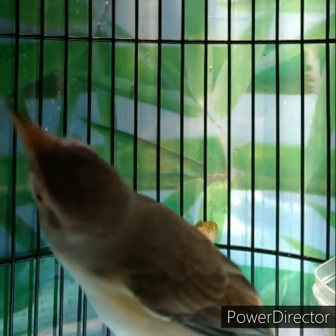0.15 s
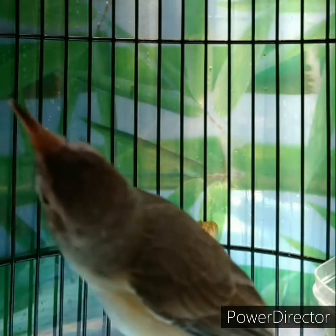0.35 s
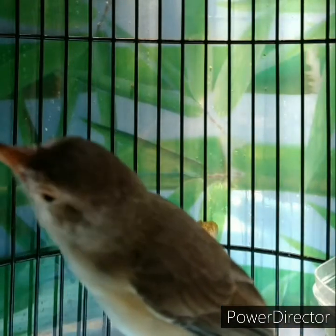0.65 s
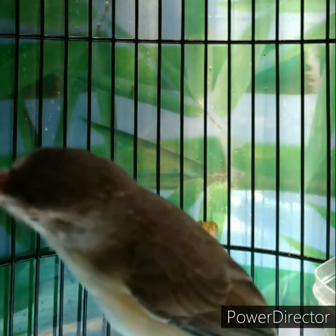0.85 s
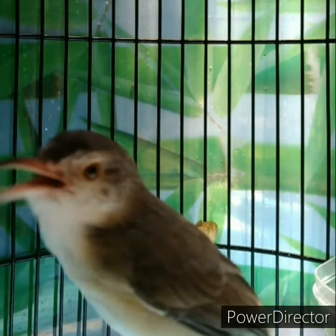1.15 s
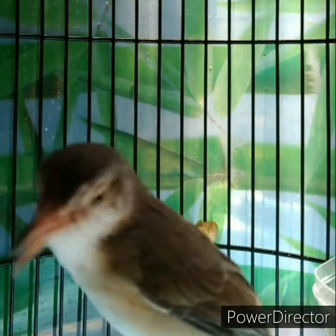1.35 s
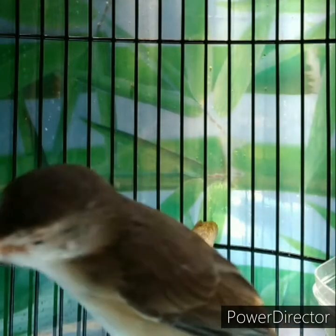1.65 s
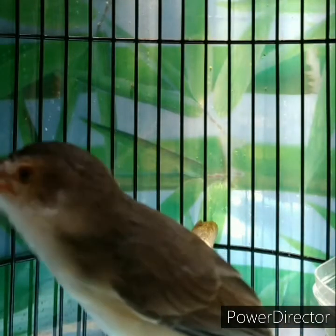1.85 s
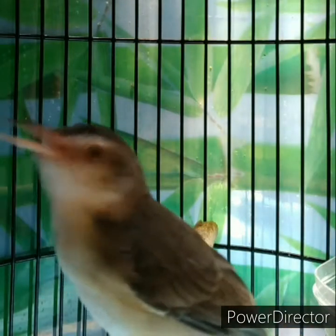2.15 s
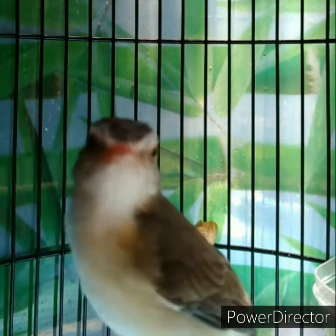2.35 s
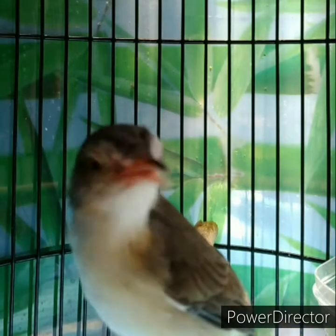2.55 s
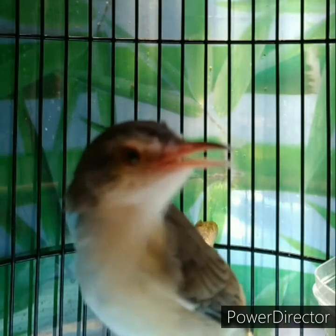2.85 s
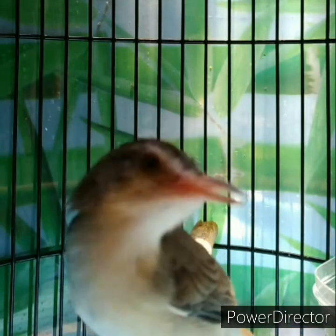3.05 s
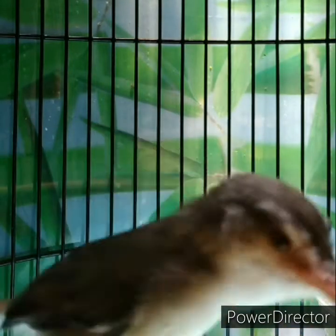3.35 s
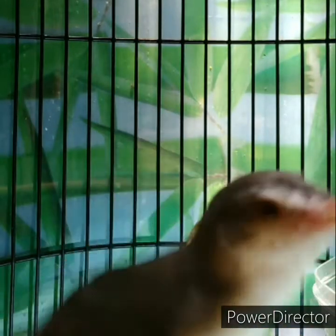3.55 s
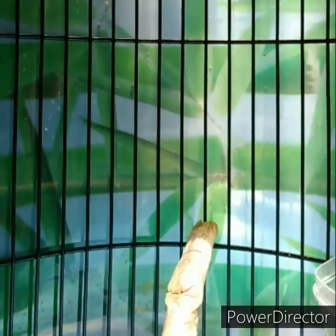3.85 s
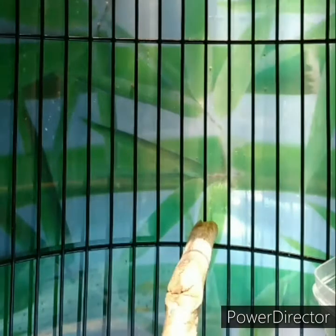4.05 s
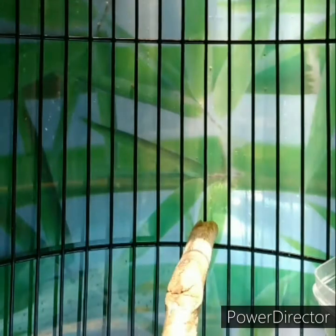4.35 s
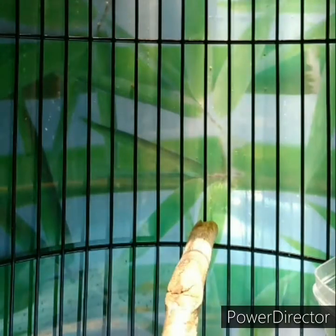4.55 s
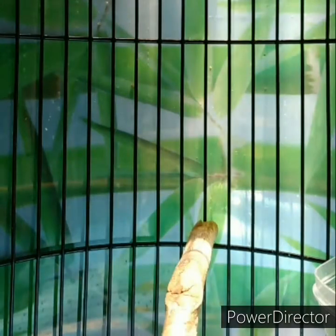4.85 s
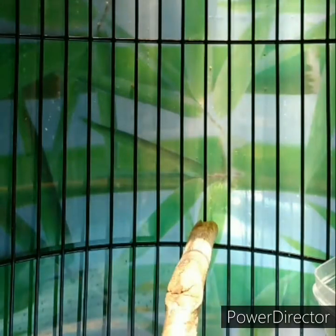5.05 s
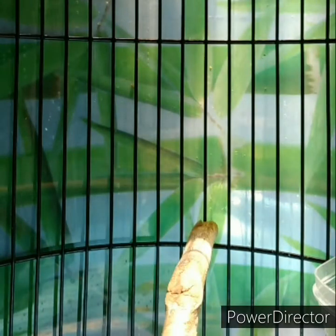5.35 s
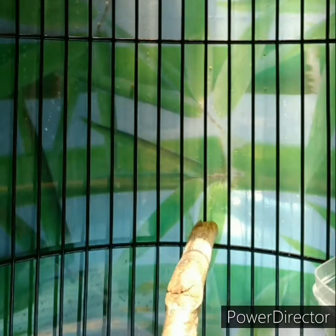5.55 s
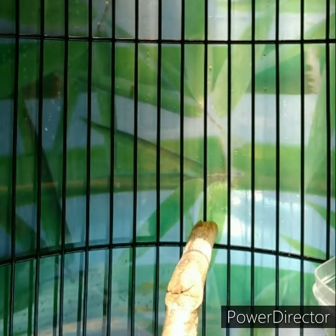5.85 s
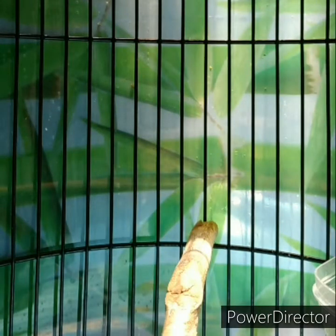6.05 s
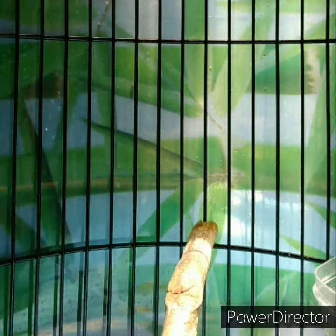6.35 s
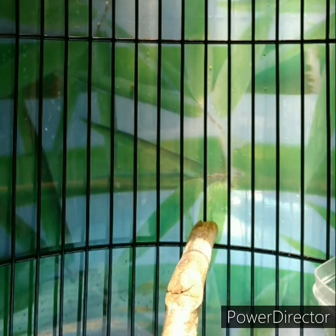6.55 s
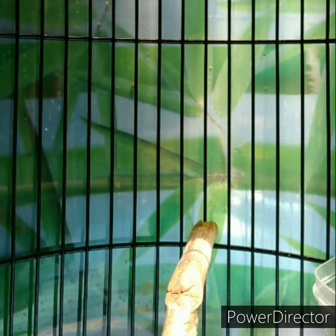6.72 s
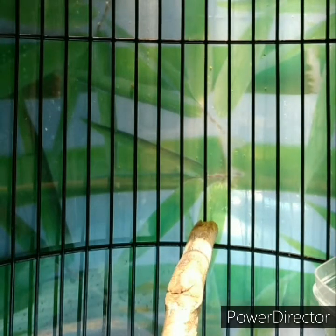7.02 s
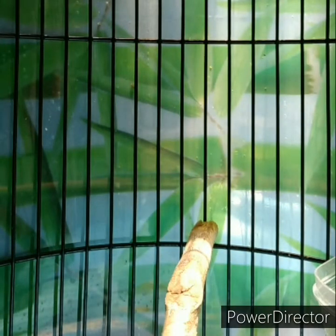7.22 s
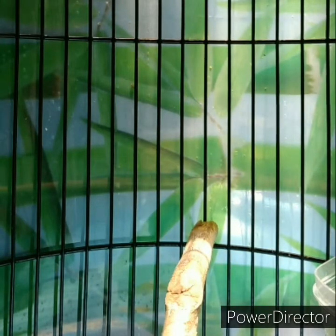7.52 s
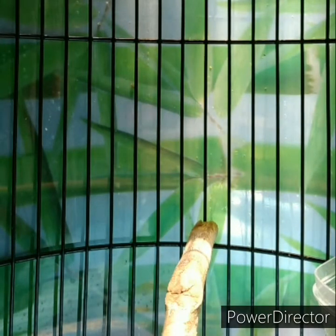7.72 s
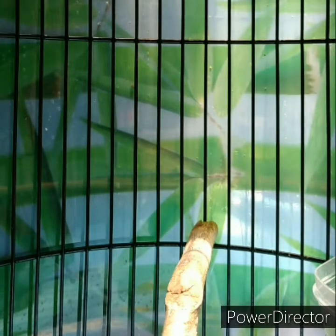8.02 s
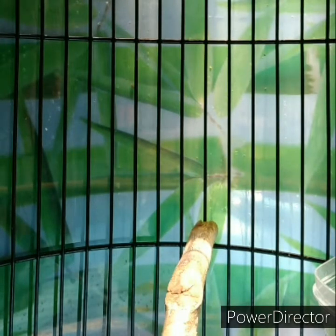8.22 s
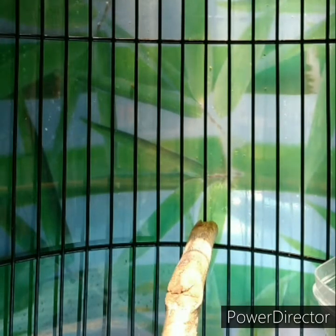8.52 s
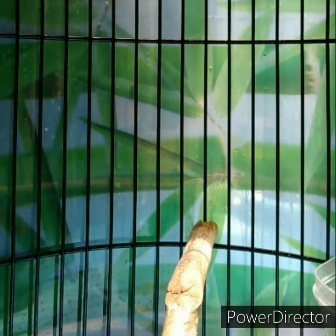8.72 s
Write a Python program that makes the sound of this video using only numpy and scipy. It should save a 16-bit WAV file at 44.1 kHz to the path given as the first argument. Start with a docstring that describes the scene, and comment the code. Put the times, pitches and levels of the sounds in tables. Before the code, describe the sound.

Rapid, ringing chirps from a nearby songbird, with thin high whistles from a second bird and soft room hum behind.

```python
"""A caged prinia, a small songbird, sings close by, about four syllables a second. Each is a tick,
a steep chip, then a ringing note, made by vibrating membranes in its voice box, the syrinx.
A second small bird cuts in with high falling whistles; others warble and pipe further off.
There are soft rustles at the cage and one lone tick. The cage and a small room add echoes, over
soft hiss, electrical hum and the murmur of traffic, in which one engine winds down."""
import sys
import numpy as np
from scipy import signal
from scipy.fft import rfft, irfft
from scipy.io import wavfile
from scipy.ndimage import uniform_filter1d, minimum_filter1d, map_coordinates

SR = 44100
rng = np.random.default_rng(int(sys.argv[2]) if len(sys.argv) > 2 else 0)


def transcribe(signal):
    """Save signal, clipped to [-1, 1], as a 16-bit WAV file at the path in sys.argv[1]."""
    frames = np.atleast_2d(signal).T
    limited = np.clip(frames, -1, 1)
    pcm = np.round(limited * 32767).astype(np.int16)
    wavfile.write(sys.argv[1], SR, pcm)


N = 391608
TIME = np.arange(N) / SR

# The prinia's song. Each row: time of the chip in seconds, seconds from there to the note's peak,
# base pitch in Hz, relative level in dB.
SYLLABLES = [(-0.012, 0.067, 2333.0, -10.8), (0.208, 0.059, 2371.0, -11.4), (0.422, 0.064, 2308.0, -12.2),
             (0.633, 0.069, 2322.0, -10.4), (0.856, 0.064, 2338.0, -11.4), (1.076, 0.066, 2368.0, -11.0),
             (1.303, 0.057, 2406.0, -9.9), (1.525, 0.066, 2345.0, -8.6), (1.745, 0.078, 2272.0, -9.8),
             (1.976, 0.063, 2341.0, -10.2), (2.196, 0.062, 2337.0, -10.1), (2.414, 0.06, 2348.0, -9.5),
             (2.645, 0.069, 2358.0, -10.4), (2.865, 0.071, 2316.0, -12.3), (3.093, 0.065, 2342.0, -10.1),
             (3.334, 0.067, 2371.0, -9.4), (3.553, 0.064, 2379.0, -8.4), (3.782, 0.063, 2333.0, -13.9),
             (4.036, 0.065, 2311.0, -15.8), (4.301, 0.075, 2268.0, -15.2), (4.535, 0.073, 2348.0, -13.8),
             (4.756, 0.067, 2387.0, -9.8), (4.988, 0.067, 2369.0, -10.5), (5.217, 0.071, 2361.0, -8.5),
             (5.453, 0.065, 2349.0, -11.4), (5.695, 0.057, 2333.0, -13.0), (7.113, 0.068, 2284.0, -14.6),
             (7.365, 0.063, 2306.0, -14.8), (7.59, 0.056, 2333.0, -15.4), (7.818, 0.063, 2380.0, -13.5),
             (8.032, 0.064, 2335.0, -13.9), (8.268, 0.058, 2379.0, -16.5), (8.498, 0.065, 2371.0, -13.5),
             (8.732, 0.07, 2342.0, -13.8)]
# A note's harmonics; the throat boosts the second. Each row: multiple of the base pitch, level in dB.
NOTE_HARMONICS = [(1, -43), (2, 0), (3, -36), (4, -30), (5, -38), (6, -41)]
# The prinia turns its head and moves about. Each row: time in seconds, left minus right level in dB.
FACING = [(0, 6.5), (.3, 1.5), (1.35, 3), (1.6, 11), (2.1, -1.5), (2.6, 14), (2.95, -2), (3.4, 10.5),
          (4.1, 0.5), (5, -12), (5.75, -3), (7.2, 8.5), (7.65, 3.5), (8.8, 0.5)]


def prinia_notes(attack_s=.044, release_s=.016, opening_s=.013, held_back_db=7, arch_hz=60):
    """Each note arches in pitch, starts held back, opens up just before its peak and is shut off fast."""
    out = np.zeros((2, N))
    t = np.arange(-.065, .03, 1 / SR)  # seconds from the peak
    for chip_time, delay, hz, db in SYLLABLES:
        peak_time = chip_time + delay
        stretch = np.exp(.14 * rng.standard_normal(3))
        attack, release, opening = np.array([attack_s, release_s, opening_s]) * stretch
        swell_db = 4 - 20 * np.where(t < 0, np.abs(t / attack) ** 1.5, np.abs(t / release) ** 3)
        held_db = held_back_db * rng.uniform(.4, 1) * (1 - np.tanh((t + opening) / .0018)) / 2
        below_top_hz = arch_hz * rng.uniform(0, 2) * (t / np.where(t < 0, .045, .03)) ** 2
        waver = .006 * wander(100, len(t)) + .007 * wander(900, len(t))
        flutter_db = 1.3 * wander(240, len(t))
        scatter_db = 4 * rng.standard_normal(len(NOTE_HARMONICS))  # varies all but the second harmonic
        harmonics = [(k, level + (k != 2) * shift)
                     for (k, level), shift in zip(NOTE_HARMONICS, scatter_db)]
        voice = tone((hz - below_top_hz) * (1 + waver), harmonics)
        voice *= undb(db + swell_db - held_db + flutter_db)
        pan_db = np.interp(peak_time, *np.transpose(FACING))
        lag_ms = perch_lag(peak_time) + .007 * rng.standard_normal()  # the head is never quite still
        add(out, peak_time + t[0], voice, pan_db, lag_ms)
    return room(out, early_db=-17, tail_db=-21.5, tail_s=.21, early_s=.008)


# The tick's sweep. Each row: seconds from the chip's peak, pitch in Hz, relative level in dB.
TICK_SWEEP = [(-.0145, 7800, -14), (-.0128, 5800, -6), (-.0115, 3800, 1), (-.0098, 2200, -11)]
# The chip's sweep. Each row: seconds from its peak, pitch in Hz, relative level in dB.
CHIP_SWEEP = [(-.008, 5400, -20), (-.004, 4500, -6), (-.001, 3650, 1), (.002, 3100, 0), (.004, 2750, -4),
              (.007, 2300, -11), (.01, 2000, -25)]


def prinia_chips(roughness=.047, flutter_db=3):
    """Two steep, scratchy downward sweeps, a tick and a chip, open each syllable, never twice alike."""
    out = np.zeros((2, N))
    for chip_time, _, _, syllable_db in SYLLABLES:
        chip_db = -17.5 + .73 * syllable_db  # louder syllables get louder chips
        for sweep in (TICK_SWEEP, CHIP_SWEEP):
            times, hz, swell_db = np.transpose(sweep)
            times = times * np.exp(.1 * rng.standard_normal())
            t = np.arange(times[0], times[-1], 1 / SR)
            detune = roughness * wander(917, len(t)) + .025 * rng.standard_normal()
            pitch = np.interp(t, times, hz) * (1 + detune)
            level_db = chip_db + np.interp(t, times, swell_db) + flutter_db * wander(685, len(t))
            voice = tone(pitch, [(1, 0), (2, -23), (3, -21)]) * signal.windows.tukey(len(t), .3)
            scratch = undb(-14) * band_noise(7000, 1.1, len(t))
            chip = (voice + scratch) * undb(level_db)
            add(out, chip_time + t[0], chip, pan_db=-1, lag_ms=perch_lag(chip_time))
    return room(out, early_db=-4, tail_db=-9, tail_s=.17)


def prinia_rasp(chip_s=.018, note_s=.05):
    """A faint, uneven hiss swells around each tick and chip, and again under the note."""
    out = np.zeros((2, N))
    t = np.arange(-.05, .14, 1 / SR)
    bands = [(1800, -60), (4800, -49), (10000, -53)]
    for chip_time, delay, _, _ in SYLLABLES:
        around_chip = undb(-1) * np.exp(-(t / chip_s) ** 2)
        under_note = undb(-3) * np.exp(-((t - delay) / note_s) ** 2)
        for pan_db in (-20, 20):  # each side gets its own hiss
            hiss = sum(undb(db) * band_noise(hz, .6, len(t)) for hz, db in bands)
            flutter = undb(2 * wander(140, len(t)))
            add(out, chip_time + t[0], hiss * (around_chip + under_note) * flutter, pan_db)
    return out


# The prinia hops to another perch and shifts along it.
# Each row: time in seconds, delay of the left side in milliseconds.
PERCH = [(3.6, .14), (4.0, .315), (4.4, .315), (4.7, .35), (5.8, .355), (7.2, .275), (8.1, .305)]


def perch_lag(time):
    """How many milliseconds later the song reaches the microphone's left side than its right."""
    return np.interp(time, *np.transpose(PERCH))


# The second bird's whistles.
# Each row: start in seconds, length in seconds, rough starting pitch in Hz, relative level in dB.
WHISTLES = [(0.149, 0.059, 7300, -19.5), (0.483, 0.053, 7060, -22.5), (0.63, 0.073, 7405, -16.5),
            (1.265, 0.035, 6820, -21.5), (1.523, 0.048, 7130, -18), (1.788, 0.056, 7100, -19),
            (2.223, 0.26, 7290, -17), (4.574, 0.029, 6740, -19.5), (4.76, 0.063, 7230, -14.5),
            (5.138, 0.044, 6440, -22.5), (5.315, 0.075, 7350, -14.5), (6.798, 0.029, 6720, -20),
            (7.192, 0.033, 6830, -16.5), (7.376, 0.07, 7240, -16.5), (7.728, 0.046, 6490, -27),
            (7.863, 0.07, 7150, -20), (8.153, 0.26, 7180, -19.5)]


def whistling_bird(knee=.71, typical_s=.11):
    """A thin whistle sinks slowly to a bend, the knee, then drops away; it beats against its echoes."""
    out = np.zeros((2, N))
    for start, length, hz, db in WHISTLES:
        progress = np.linspace(0, 1, int(length * SR))
        sag_hz = 626 * np.sqrt(length / typical_s) * progress / knee  # longer whistles sink further
        past_knee = np.maximum(progress - knee, 0) / (1 - knee)
        drop_hz = 1250 * past_knee ** 2 * np.sqrt(min(typical_s / length, 1))
        pitch = (hz + 40 - sag_hz - drop_hz) * (1 + .0082 * wander(252.7, len(progress)))
        swell = np.interp(progress, [0, .1, .35, .78, .92, 1], [0, .4, 1.1, 1.05, .35, 0])
        flutter_db = 2.2 * wander(170, len(progress))
        voice = tone(pitch, [(1, -1.5), (2, -22)]) * swell * undb(db - 1 + flutter_db)
        add(out, start, voice, pan_db=7, lag_ms=.14)
    return room(out, early_db=-6, tail_db=-12, tail_s=.25, early_s=.014)


# A warbler across the room. Each row: start in seconds, length in seconds,
# starting pitch in Hz (raised to low_hz if below it), relative level in dB.
WARBLES = [(1.765, 0.12, 3970, -35), (2.578, .12, 3850, -37), (3.837, 0.054, 2670, -40.5),
           (3.994, 0.15, 3635, -38.5), (4.393, 0.12, 3270, -42), (4.645, 0.14, 4017, -37),
           (5.091, 0.097, 2600, -39), (5.305, .11, 3900, -34)]


def warbler(fall_hz_per_s=15500, low_hz=2680, end_hz=3400):
    """Calls that dip to one low pitch and climb again smoothly, arriving mostly by way of the walls."""
    out = np.zeros((2, N))
    for start, length, hz, db in WARBLES:
        fall_s = np.clip((hz - low_hz) / fall_hz_per_s, 0, length)
        bend = np.interp(np.arange(0, length, 1 / SR), [0, fall_s, length], [-1, 0, 1])
        height_hz = np.where(bend < 0, hz, end_hz) - low_hz
        pitch = low_hz + height_hz * np.sin(np.pi / 2 * bend) ** 2
        call = gliding_call(pitch, waver=.0363, overtone_db=-25, flutter_db=4.5)
        add(out, start, call * undb(db - 7))
    return room(out, early_db=4.5, tail_db=7.5, tail_s=.24)


# Far birds' piping. Each row: start in seconds, length in seconds, first and last pitch in Hz,
# relative level in dB.
PIPES = [(0.283, 0.13, 1770, 2380, -64), (1.134, 0.16, 1865, 2650, -60), (3.201, 0.38, 2270, 2533, -64),
         (4.095, 0.11, 1600, 1611, -64), (4.306, .17, 1400, 1213, -64.5), (5.827, 0.098, 3840, 3730, -63),
         (6.306, 0.5, 2037, 1915, -65.5), (6.509, 0.074, 2800, 2795, -55),
         (8.377, 0.098, 1570, 1674, -62.5), (8.57, 0.096, 1340, 1260, -60.5)]
# Far birds' chirps. Each row: start in seconds, length in seconds, starting pitch in Hz.
FAR_CHIRPS = [(3.227, 0.017, 4580), (6.088, 0.011, 4440), (6.337, 0.037, 5920), (6.382, .09, 5160),
              (6.549, 0.079, 5570)]


def far_birds(fall_octaves_per_s=10):
    """Thin gliding pipes and quick falling chirps, blurred by distance."""
    out = np.zeros((2, N))
    for start, length, start_hz, end_hz, db in PIPES:
        pitch = np.linspace(start_hz, end_hz, int(length * SR))
        add(out, start, gliding_call(pitch, waver=.011, overtone_db=-14, flutter_db=4.5) * undb(db))
    for start, length, hz in FAR_CHIRPS:
        pitch = hz * 2 ** (-fall_octaves_per_s * np.arange(0, length, 1 / SR))
        add(out, start, gliding_call(pitch, waver=.03, overtone_db=-14, flutter_db=4) * undb(-52))
    return room(out, early_db=5, tail_db=6, tail_s=.5)


# Rustles at the cage and, at 6.922 seconds, a bird's lone tick. Each row: time of the middle
# in seconds, half the length in seconds, centre frequency in Hz, relative level in dB.
PUFFS = [(5.646, 0.047, 6360, -42.5), (6.635, 0.045, 5400, -41.5), (6.922, 0.0075, 3870, -30),
         (7.003, 0.018, 5500, -41), (3.646, 0.082, 7050, -62), (5.077, 0.033, 4500, -33.5)]


def rustles_and_tick():
    """Short, soft puffs of noise: rustles at the cage and one lone bird's tick."""
    out = np.zeros((2, N))
    for middle, half_length, hz, db in PUFFS:
        size = int(2 * half_length * SR)
        grain = undb(3 * wander(200, size))
        puff = band_noise(hz, .69, size) * np.hanning(size) * grain
        add(out, middle - half_length, puff * undb(db - 3))
    return room(out, early_db=-6, tail_db=-6, tail_s=.28)


# The tone colour of the room's air. Each row: frequency in Hz, relative level in dB.
AIR_SPECTRUM = [(18, -45), (30, -5.5), (107, -5.5), (150, -11), (253, -13.5), (355, -16.5), (448, -16),
                (1140, -23.5), (3980, -18), (4650, -16), (5440, -32.5), (7060, -14), (8690, -21),
                (11300, -19), (15000, -35)]
# How alike the air sounds left and right. Each row: frequency in Hz, likeness (1 means the same).
AIR_LIKENESS = [(60, 1), (250, 0.86), (600, 0.23), (1200, 0.093), (12000, 0.015)]


def room_air(level_db=-46):
    """A nearly steady rush of air, its bass in the middle and its treble spread wide."""
    likeness = np.clip(spectrum_curve(AIR_LIKENESS), -1, 1)
    colour = undb(spectrum_curve(AIR_SPECTRUM))
    mid = irfft(rfft(rng.standard_normal(N)) * colour * np.sqrt(1 + likeness), N)
    side = irfft(rfft(rng.standard_normal(N)) * colour * np.sqrt(1 - likeness), N)
    return unit(np.array([mid + side, mid - side])) * undb(level_db - .53 * wander(3.6, N))


# The tones of the hum. Each row: frequency in Hz, level in dB.
HUM_TONES = [(47, -56.5), (64, -59), (100, -51.5), (519, -68.5)]


def electrical_hum(drift_hz=.55, flicker_db=.44):
    """Mains hum: a few pure tones, each drifting a little in pitch and level."""
    return sum(tone(hz + drift_hz * wander(4.7, N), [(1, db)]) * undb(flicker_db * wander(3.55, N))
               for hz, db in HUM_TONES)


# A far engine. Each row: time in seconds, firings per second, relative level in dB.
ENGINE = [(3.2, 54.9, -72), (3.8, 54, -65.5), (5.4, 53.8, -63), (6.3, 58, -55), (6.7, 55.7, -53.5),
          (7.2, 47, -56.5), (7.5, 46.4, -62)]
# The rumble of the road. Each row: time in seconds, level in dB.
RUMBLE = [(0, -72), (4, -65.5), (7.1, -62), (7.35, -52.5), (8.88, -52)]


def traffic():
    """Traffic rumbles and drones through the walls; one engine grows louder, then winds down."""
    times, firing_hz, db = np.transpose(ENGINE)
    firing = np.interp(TIME, times, firing_hz) * (1 + .02 * wander(45, N))
    engine = tone(firing, [(4, -11), (5, .5), (6, -29), (7, -14)])
    engine *= undb(np.interp(TIME, times, db) + 2 * wander(4.7, N))
    rumble = band_noise(152.6, .28, N) * undb(np.interp(TIME, *np.transpose(RUMBLE)))
    drone = band_noise(349, .2, N) * undb(-58 + 2 * wander(2.483, N))
    return engine + rumble + drone


def room(dry, early_db, tail_db, tail_s, early_s=.0074):
    """Add quick echoes off the cage and wall, then the room's tail, which fades 60 dB in tail_s."""
    t = TIME[:SR // 2]
    shape = (2, len(t))
    sparse_echoes = rng.standard_normal(shape) * (rng.random(shape) < .1)
    early = sparse_echoes * np.exp(-t / early_s) * (t > .001)
    tail = rng.standard_normal(shape) * np.exp(-np.log(1000) * t / tail_s) * (t > .008)
    echoes = (undb(early_db) * unit(early) + undb(tail_db) * unit(tail)) / np.sqrt(len(t))
    return dry + signal.fftconvolve(dry, echoes, axes=1)[:, :N]


def gliding_call(pitch, waver, overtone_db, flutter_db):
    """A whistled call that swells, quavers and fades as it follows the given pitch."""
    progress = np.linspace(0, 1, len(pitch))
    voice = tone(pitch * (1 + waver * wander(118.5, len(pitch))), [(1, 0), (2, overtone_db)])
    swell = 2 * np.sqrt(progress * (1 - progress))
    return voice * swell * undb(flutter_db * wander(99.8, len(pitch)))


def tone(hz, harmonics):
    """A vibration on one gliding pitch; each harmonic is a multiple of that pitch and a level in dB."""
    phase = 2 * np.pi * np.cumsum(hz) / SR
    return np.sqrt(2) * sum(undb(db) * np.sin(k * phase) * (k * hz < SR / 2) for k, db in harmonics)


def band_noise(hz, octaves, size):
    """Noise in a bell-shaped band around hz."""
    frequencies = np.fft.rfftfreq(size, 1 / SR) + 1
    bell = np.exp(-(np.log2(frequencies / hz) / octaves) ** 2)
    return unit(irfft(rfft(rng.standard_normal(size)) * bell, size))


def wander(rate, size):
    """A smooth random wobble, roughly 1 either way, through rate random values a second."""
    return map_coordinates(rng.standard_normal(512), [np.arange(size) * rate / SR], order=3, mode="mirror")


def spectrum_curve(points):
    """Join (Hz, value) points into a curve over all the frequencies of the sound."""
    hz, value = np.transpose(points)
    return np.interp(np.log(np.fft.rfftfreq(N, 1 / SR) + 1), np.log(hz), value)


def add(out, start, sound, pan_db=0, lag_ms=0):
    """Mix a sound into stereo, with the left side pan_db louder and lag_ms later than the right."""
    gains = unit(undb(np.array([pan_db, -pan_db]) / 2))
    for track, gain, lag in zip(out, gains, (lag_ms, 0)):
        offset = int(start * SR) + round(lag * SR / 1000)
        first, last = np.clip([offset, offset + len(sound)], 0, N)
        track[first:last] += gain * sound[first - offset:last - offset]


def undb(db):
    """Turn decibels into a number to multiply by."""
    return 10 ** (np.asarray(db) / 20)


def unit(x):
    """Scale to an average power of 1."""
    return x / np.sqrt(np.mean(x ** 2))


def scene():
    """The prinia and the other birds over air, hum and traffic."""
    prinia = prinia_notes() + prinia_chips() + prinia_rasp()
    other_birds = whistling_bird() + warbler() + far_birds()
    return prinia + other_birds + rustles_and_tick() + room_air() + electrical_hum() + traffic()


# The treble of the microphone's two openings. Each row: frequency in Hz, left and right gain in dB.
MIC_COLOUR = [(5000, 0, 0), (7200, 1, -2.5), (8600, -3, 0), (10800, -7, 2.5), (14200, -6, 2.5),
              (15400, -14, -7)]


def record(dry, ceiling=.98, top_hz=15400):
    """The microphone colours each side, a quick limiter turns peaks down, and the top treble is cut."""
    hz, *sides = np.transpose(MIC_COLOUR)
    colour = undb([spectrum_curve(np.c_[hz, db]) for db in sides])
    coloured = irfft(rfft(dry) * colour, N)
    needed_gain = ceiling / np.maximum(np.abs(coloured), ceiling)
    smooth_gain = uniform_filter1d(minimum_filter1d(needed_gain, size=180), size=180)
    lowpass = signal.ellip(8, .05, 60, top_hz, fs=SR, output="sos")
    return signal.sosfiltfilt(lowpass, coloured * smooth_gain)


dry = scene()
out = record(dry)
transcribe(out)
```